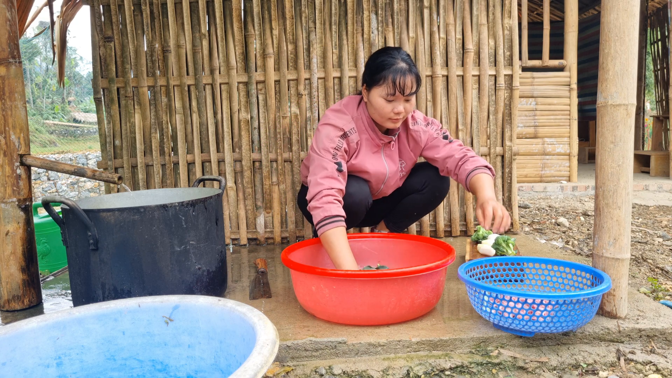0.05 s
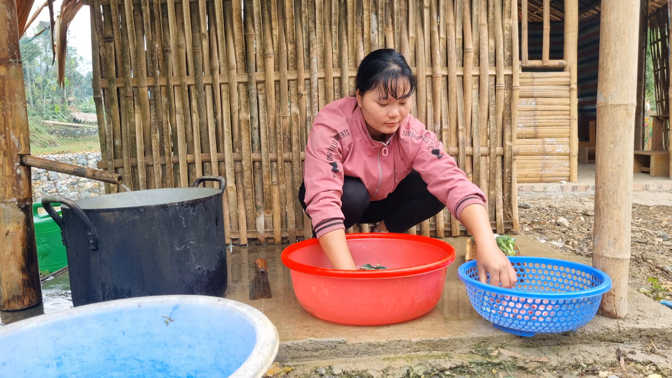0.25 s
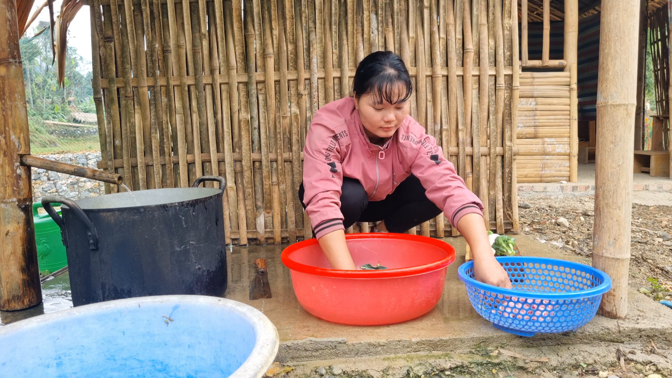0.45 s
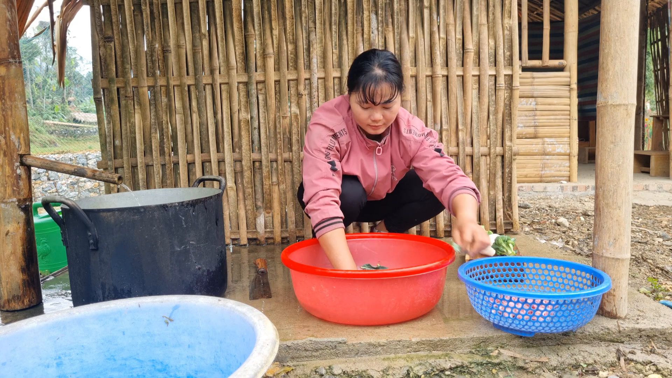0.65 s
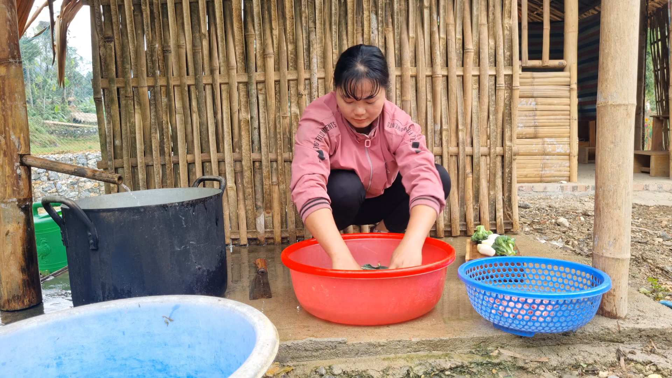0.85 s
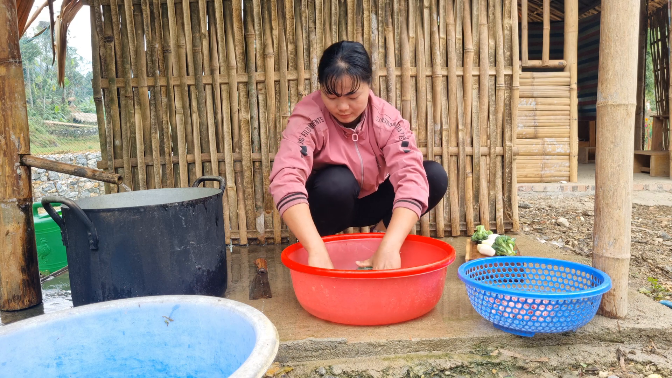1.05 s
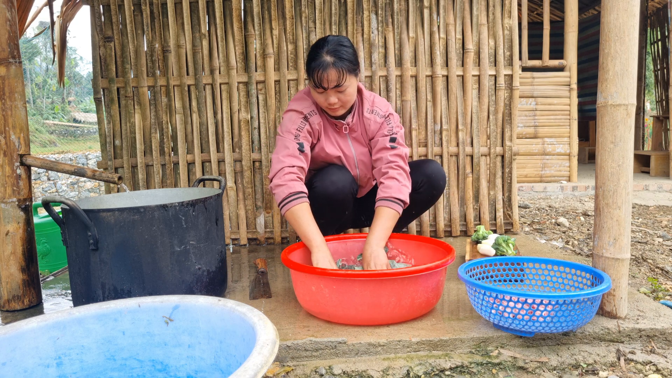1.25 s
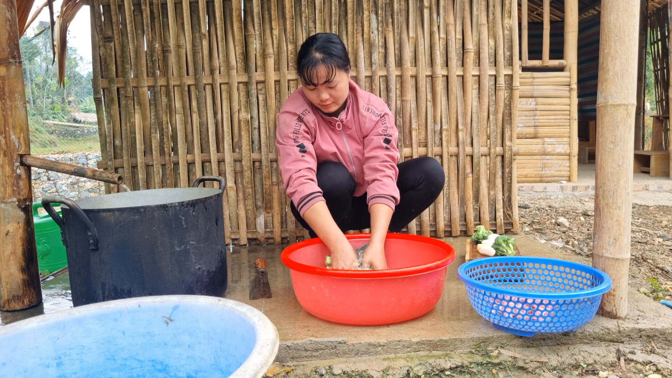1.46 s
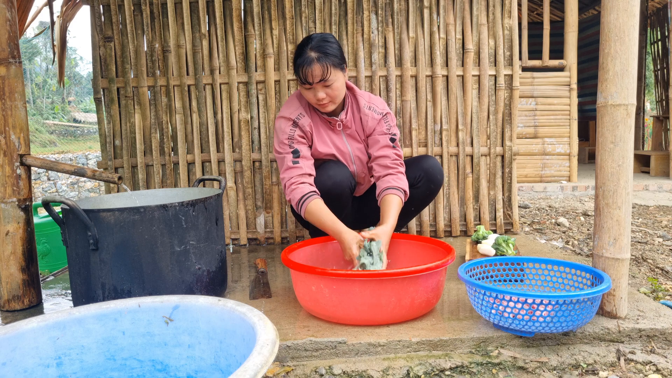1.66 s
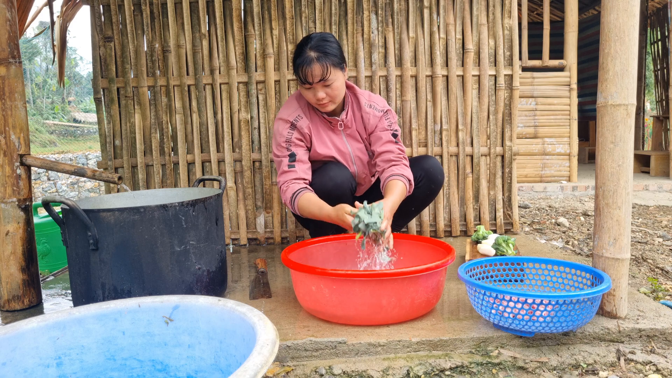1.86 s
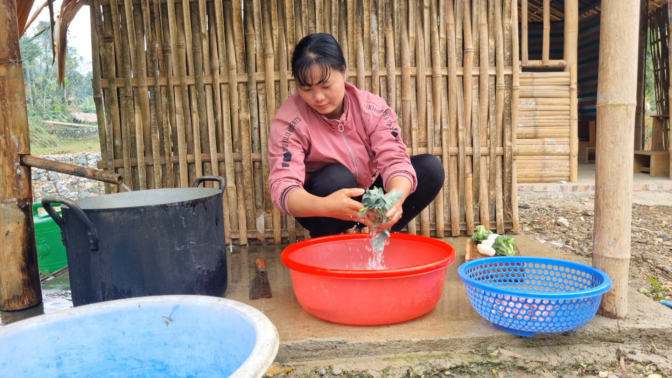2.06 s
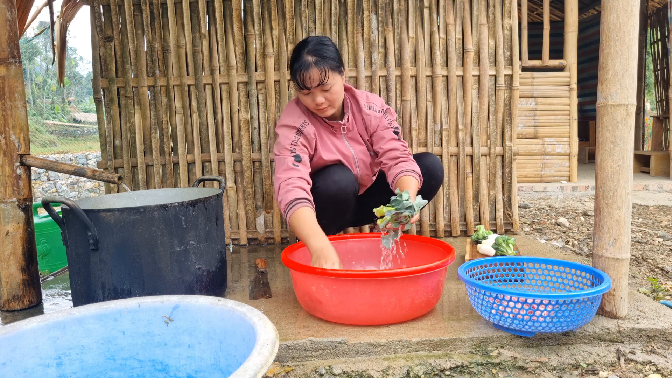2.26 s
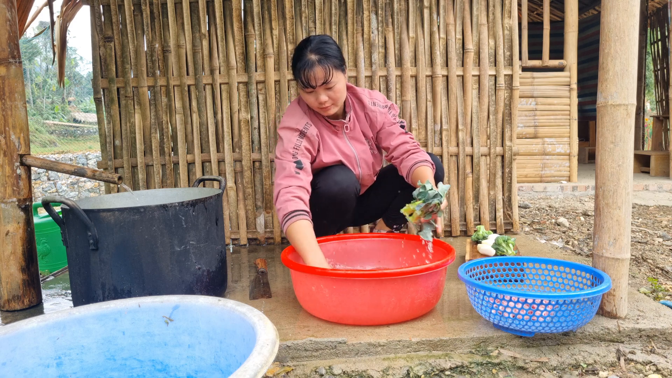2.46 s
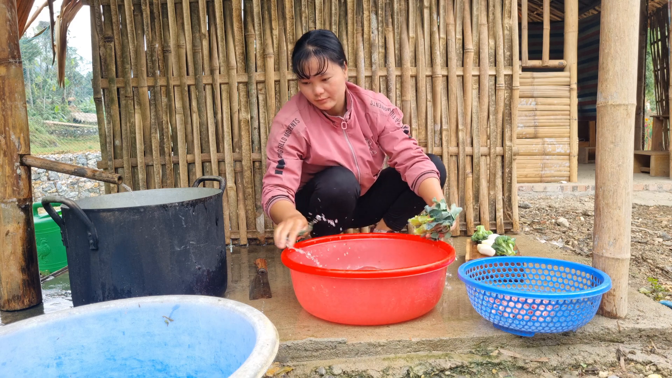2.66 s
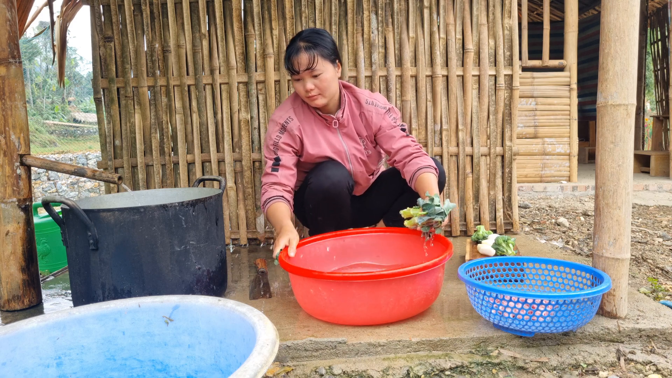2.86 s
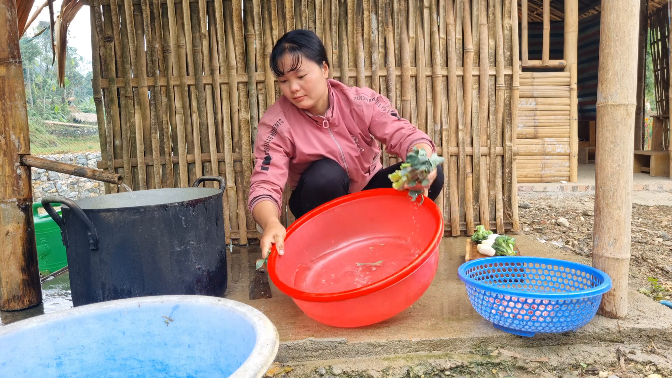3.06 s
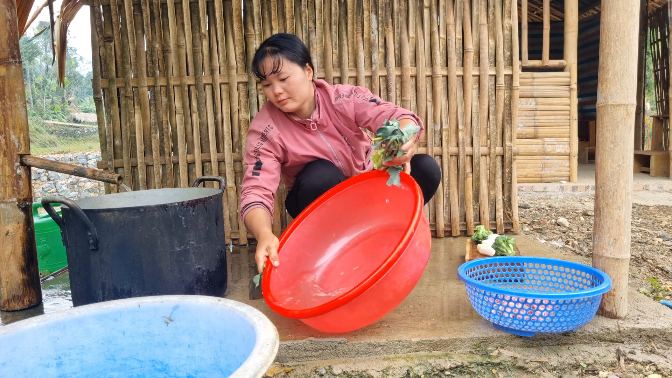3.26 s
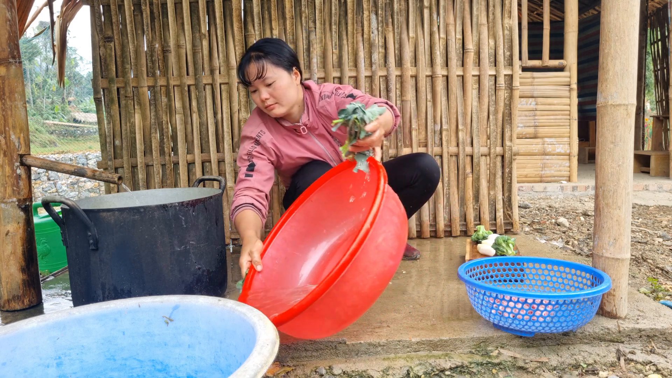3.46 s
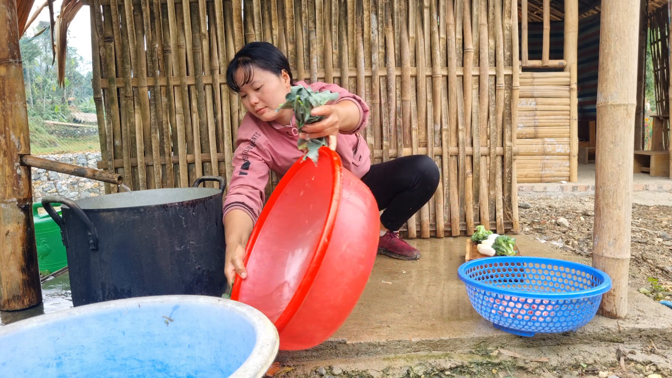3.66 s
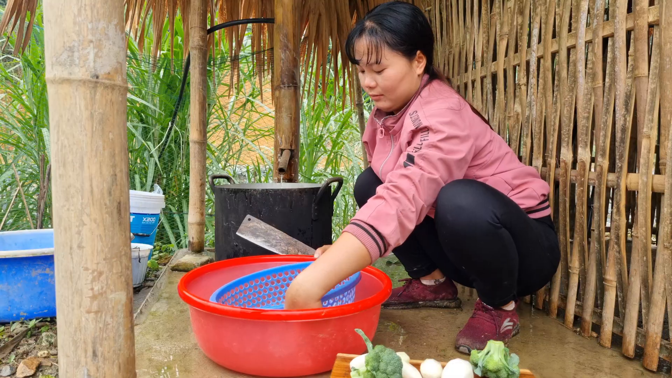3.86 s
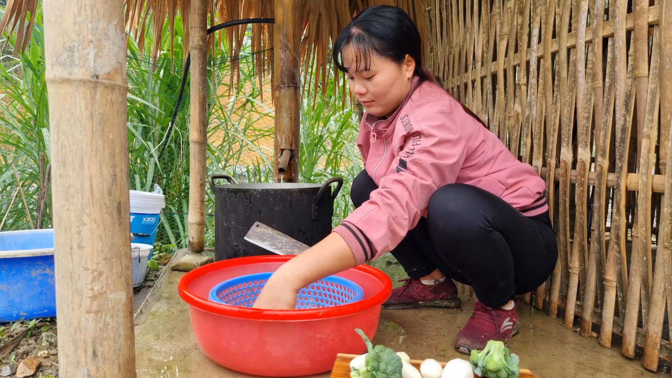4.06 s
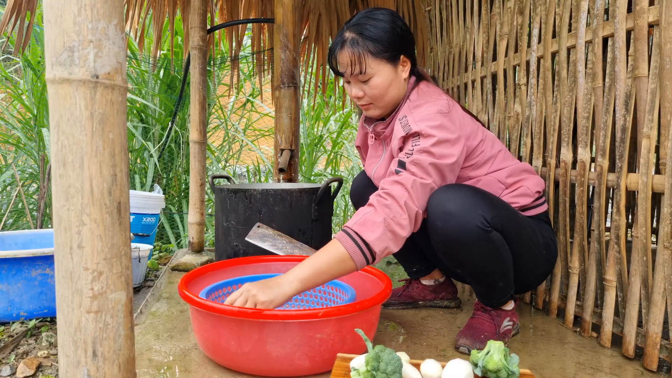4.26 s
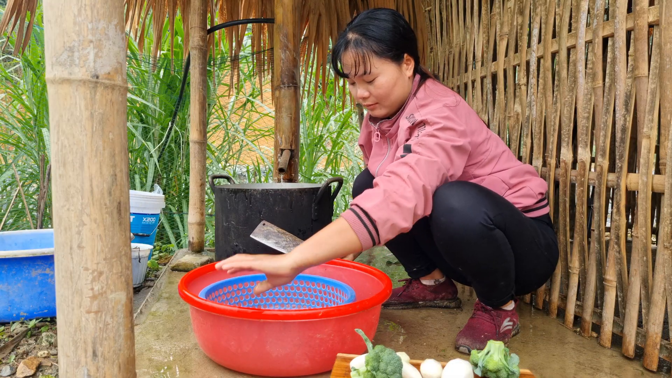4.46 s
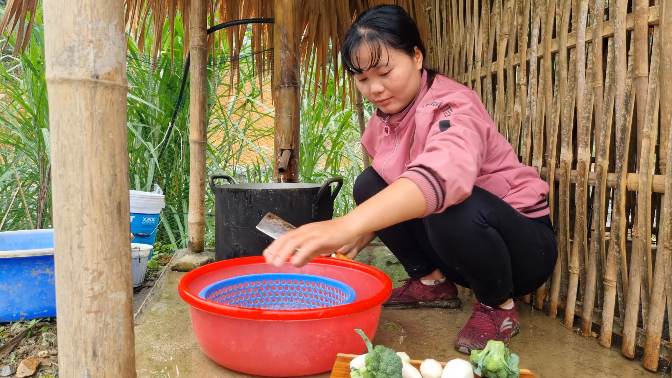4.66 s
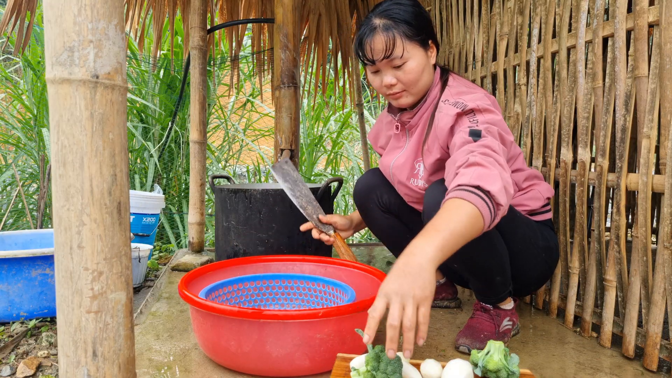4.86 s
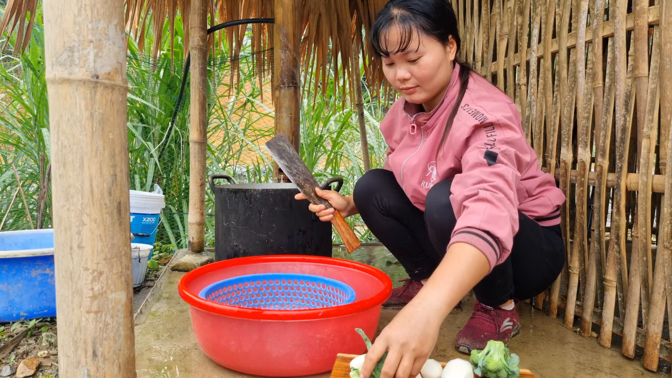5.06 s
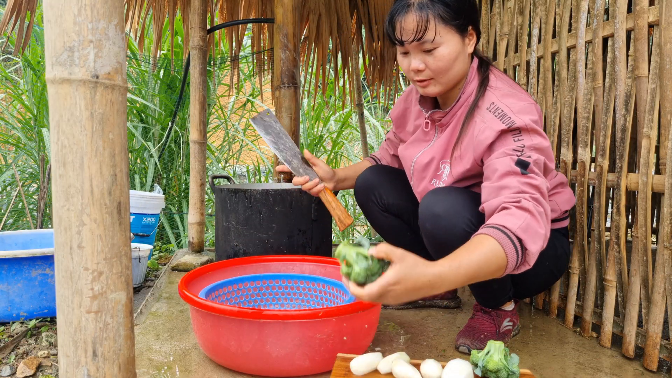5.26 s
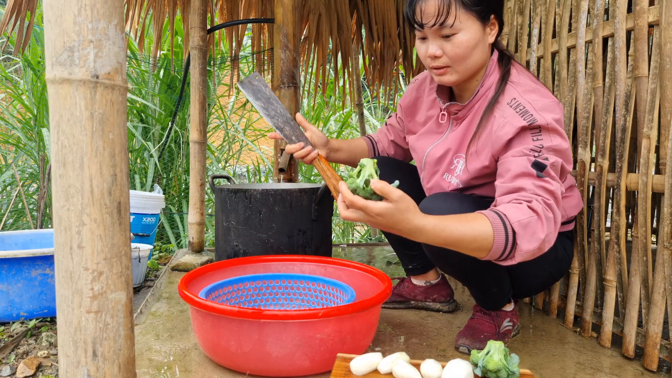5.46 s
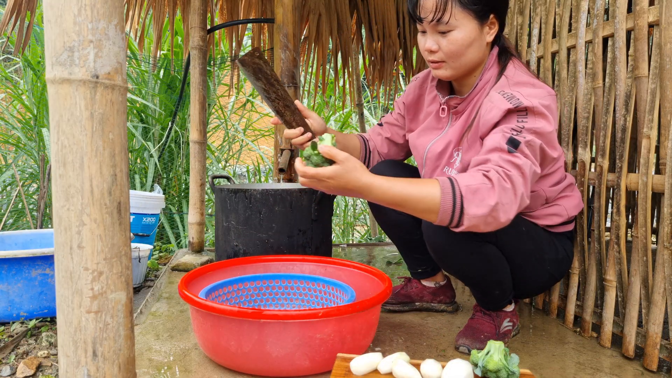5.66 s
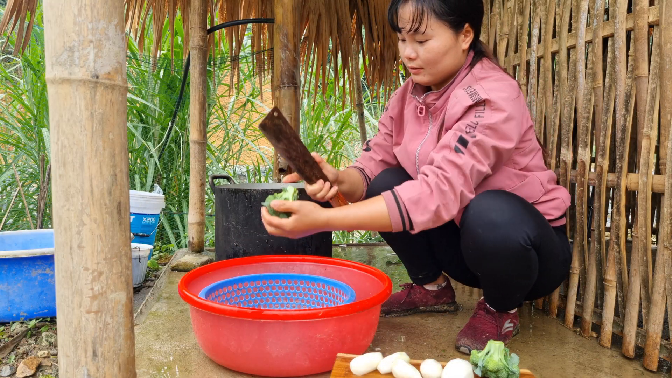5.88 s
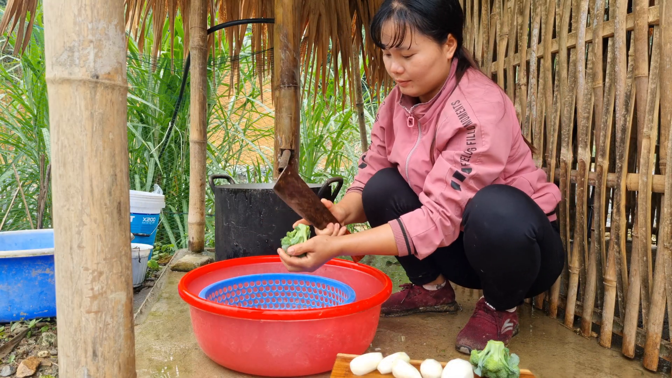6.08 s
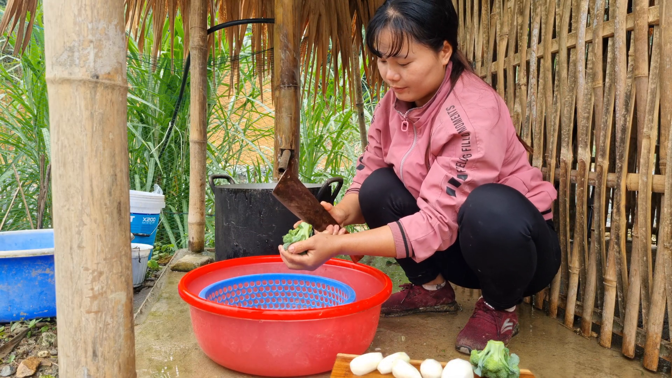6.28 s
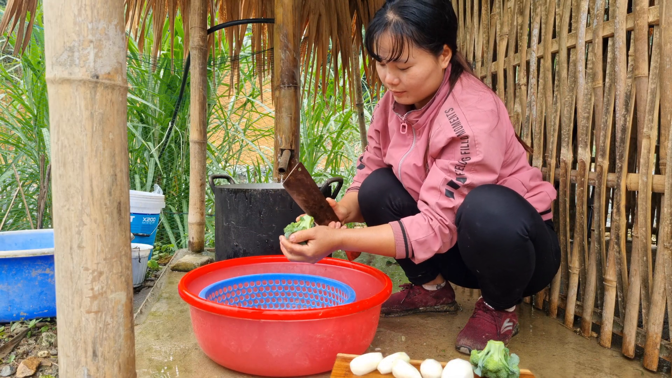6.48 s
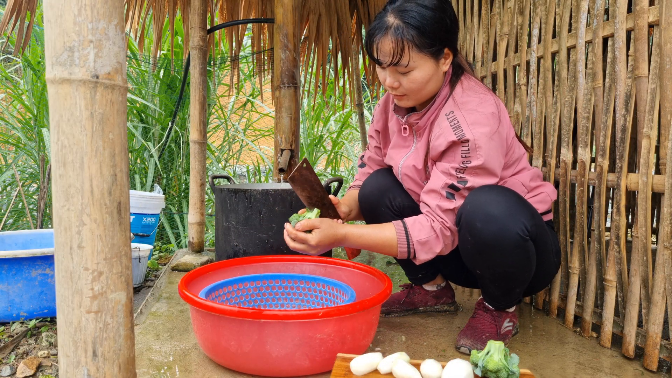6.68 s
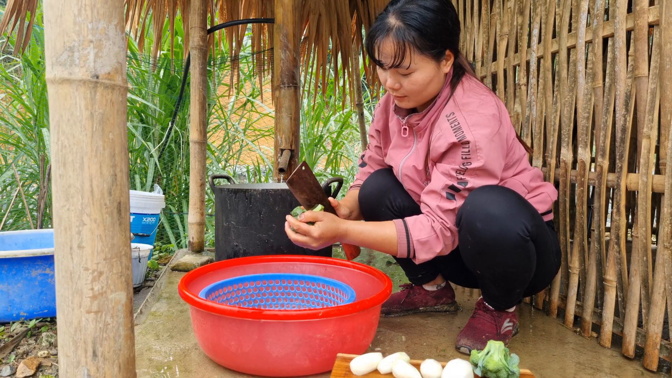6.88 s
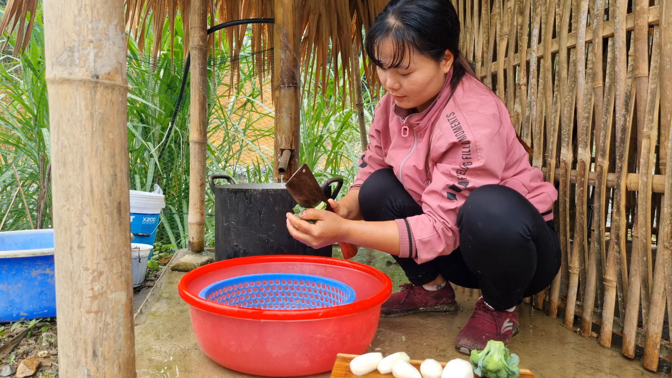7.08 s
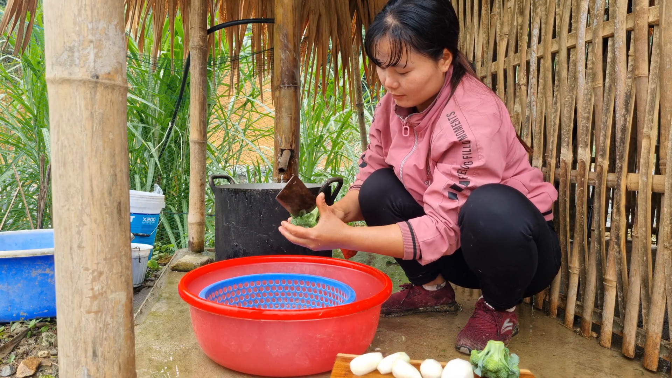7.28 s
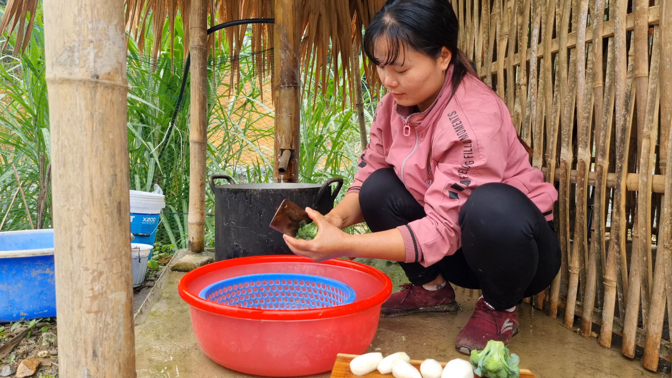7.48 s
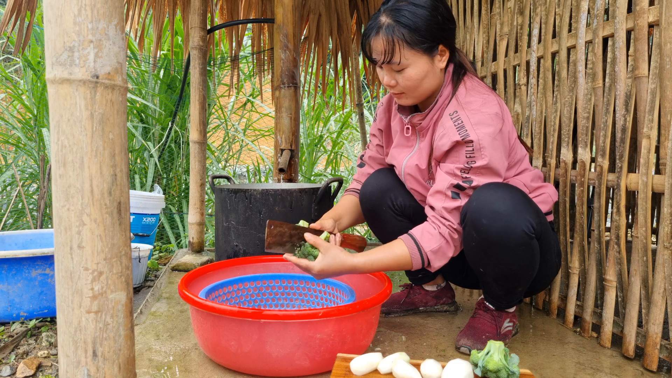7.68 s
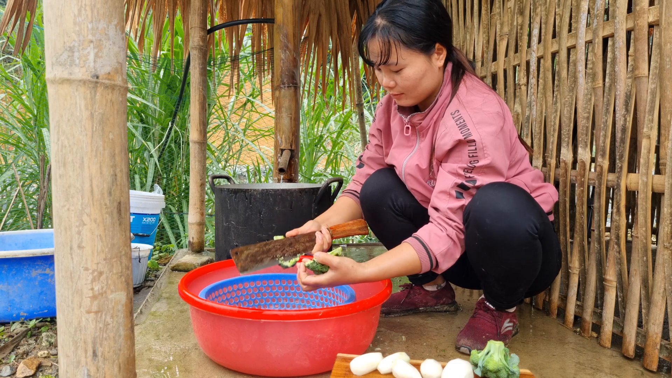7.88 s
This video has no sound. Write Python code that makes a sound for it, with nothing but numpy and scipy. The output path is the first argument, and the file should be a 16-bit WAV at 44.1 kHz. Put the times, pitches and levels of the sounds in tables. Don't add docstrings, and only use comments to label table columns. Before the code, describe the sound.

From 0 to about 1.1 s, sparse drips and soft swishes sound in a plastic basin over faint outdoor hiss and a barely audible distant idling engine. From 1.2 to 2.7 s the stirring gets busier: rising bubble plops, bright droplets, run-off spattering as greens are lifted; small high chick peeps appear from 2.25 s. Around 2.8 to 3.1 s the load sloshes and the basin knocks and rattles. At 3.45 s it tips, water gushes on concrete, strongest near 3.7 s, with a sharp rim slam at 3.66 s and loud hollow plastic bangs from 3.8 to 4.0 s. At 4 s the water ends and a low, steady engine hum enters. More knocks fall at 4.33 and 6.2 s. Until 8 s, sleeves rustle, a knife rasps and ticks in short gritty strokes, densest after 7 s, while a hen clucks softly and distant birds mutter.

```python
import sys
import numpy as np
from scipy import signal
from scipy.fft import rfft, irfft, next_fast_len
from scipy.io import wavfile
from scipy.ndimage import uniform_filter1d, map_coordinates

SR = 44100
rng = np.random.default_rng(int(sys.argv[2]) if len(sys.argv) > 2 else 0)


def transcribe(signal):
    frames = np.atleast_2d(signal).T
    limited = np.clip(frames, -1, 1)
    pcm = np.round(limited * 32767).astype(np.int16)
    wavfile.write(sys.argv[1], SR, pcm)


def boost(x):
    u = np.asarray(x, float) / 20
    return 10 ** u


N = 349713
T = np.arange(N) / SR


def unit(x):
    return x / np.sqrt(np.mean(x ** 2) + 1e-20)


def along(points, hz):
    f, v = np.transpose(points)
    return np.interp(np.log(hz + 1), np.log(f + 1), v)


def curves(rows):
    s, *cols = np.transpose(rows)
    gate = np.interp(T, [s[0] - .006, s[0], s[-1], s[-1] + .006], [0, 1, 1, 0])
    return [np.interp(T, s, c) for c in cols] + [gate]


def wobble(rate_hz):
    return map_coordinates(rng.standard_normal(int(N * rate_hz / SR) + 4), [T * rate_hz])


def swells(rows, skew=0.79, power=2.2):
    total = 0
    for s, length_s, db in rows:
        phase = np.clip((T - s) / length_s, 0, 1) ** skew
        total = total + boost(db) * np.abs(np.sin(np.pi * phase)) ** power
    return total


def colour(x, spectrum):
    m = next_fast_len(N + 8192)
    gain = boost(along(spectrum, np.fft.rfftfreq(m, 1 / SR)))
    return unit(irfft(rfft(x, m) * gain, m)[..., :N])


def rush(spectrum, patchy_db):
    # (f/Hz, correlation)
    alike = [(60, 0.89), (240, 0.96), (950, 0.28), (3770, 0.04), (15000, 0.0079)]
    hz, _, z = signal.stft(rng.standard_normal((2, N)), SR, nperseg=256)
    field = uniform_filter1d(rng.standard_normal(z.shape[1:]), size=4, axis=0)
    field = uniform_filter1d(field, size=7, axis=1)
    turn = np.arccos(np.clip(along(alike, hz), -1, 1))[:, None] / 2
    mid, side = z[0] * np.cos(turn), z[1] * np.sin(turn)
    pair = np.array([mid + side, mid - side]) * boost(patchy_db * unit(field))
    return colour(signal.istft(pair, SR, nperseg=256)[1][:, :N], spectrum)


def grains(count, hz, spread, cycles, scatter_db, rise):
    u, t = rng.random((count, 4)), np.arange(700) / SR
    f = np.clip(hz * np.exp(spread * (2 * u[:, 1:2] - 1)), 200, 14000)
    life = t * f / cycles
    tone = np.sin(2 * np.pi * f * t * (1 + rise * life)) * life * np.exp(-3 * life)
    tone *= boost(-scatter_db * np.log(u[:, 2:3] + .02))
    at = ((u[:, :1] * N).astype(int) + np.arange(len(t))).ravel()
    shares = u[:, 3:], 1 - u[:, 3:]
    return unit(np.array([np.bincount(at, (tone * np.sqrt(p)).ravel(), N + 800)[:N] for p in shares]))


def blip(hz, t60, swell, rise, noisy, width):
    t = np.arange(int(.25 * SR)) / SR
    edges = [hz / (1 + width), min(hz * (1 + width), 18000)]
    band = signal.butter(2, edges, "bandpass", fs=SR, output="sos")
    hiss = unit(signal.sosfilt(band, rng.standard_normal(len(t))))
    tone = np.sin(2 * np.pi * hz * t * (1 + rise * t / t60))
    shape = boost(-60 * t / t60) * (1 - np.exp(-t / (swell * t60))) ** 2
    hiss = hiss * np.linalg.norm(shape) / np.linalg.norm(hiss * shape)
    return ((1 - noisy) * tone + noisy * hiss / 2) * shape / shape.max()


def add(out, s, sound, pan_db):
    at = round(s * SR)
    out[:, at:at + len(sound)] += (boost([[pan_db / 2], [-pan_db / 2]]) * sound)[:, :N - at]


def left_first(x):
    return np.array([x[0], np.roll(x[1], 2)])


def bands(x):
    # (f/Hz, width/Hz, level/dB)
    throat = [(687, 45, 1), (1170, 70, 2), (1744, 70, -6), (1920, 32, 1)]
    for hz, width, db in throat:
        band = signal.butter(1, [hz - width / 2, hz + width / 2], "bandpass", fs=SR, output="sos")
        yield db, signal.sosfilt(band, x)


def yard():
    # (f/Hz, level/dB per Hz)
    spectrum = [(88, -4), (150, -4), (645, 29), (1500, -35), (7770, 2), (9080, -24), (14800, 14),
                (16000, 19)]
    return boost(-67.5) * rush(spectrum, patchy_db=-3.5)


def orders(rows, levels, unsteady_db, drift_rad=0.32):
    hz, db, gate = curves(rows)
    turn = 2 * np.pi * np.cumsum(hz) / SR
    hum = 0
    for k, level_db in levels:
        gain = boost(level_db + unsteady_db * wobble(2.994))
        hum = hum - gain * np.cos(k * turn + drift_rad * wobble(4.6))
    return gate * boost(db) * unit(hum) * boost([[1.2], [-1.2]])


def engine():
    # (t/s, firing/Hz, level/dB)
    working = [
        (4.02, 31.75, -49),
        (4.3, 32.69, -47),
        (4.8, 31.7, -47.5),
        (5.03, 33.75, -46),
        (5.2, 32.07, -48),
        (6.5, 32.98, -48),
        (7.93, 33, -49),
    ]
    # (multiple, level/dB)
    working_orders = [(1, -28), (2, 2), (3, -9), (4, -1.5), (5, -5.5), (6, -23), (7, -27), (8, -34)]
    # (t/s, firing/Hz, level/dB)
    idling = [
        (0, 18.7, -65),
        (1.1, 18, -73),
        (1.6, 18.6, -58),
        (2.0, 17.2, -66.5),
        (2.5, 18, -63),
        (3.4, 18, -81),
    ]
    # (multiple, level/dB)
    idling_orders = [(4, 4), (5, 5), (6, 5), (7, -31)]
    # (f/Hz, level/dB per Hz)
    rumble_spectrum = [(13, -30), (22, 0), (59, 6), (140, 1), (160, 5.5), (220, -34), (290, -43),
                       (480, -120)]
    _, db, gate = curves(working)
    rumble = gate * boost(db - 7.5) * rush(rumble_spectrum, patchy_db=-2.0)
    hum = orders(working, working_orders, unsteady_db=1.55)
    return hum + orders(idling, idling_orders, unsteady_db=2.5, drift_rad=1.8) + rumble


def clucks():
    # (t/s, peak/dB, f/Hz)
    events = [(4.109, -36.5, 1890), (4.155, -40.5, 1155), (4.2, -43, 692), (4.245, -47, 1110),
              (4.434, -47, 590), (4.541, -42, 570), (4.644, -46, 510), (4.649, -48, 1110),
              (4.65, -44.5, 1570), (4.838, -46, 1260), (4.838, -47, 680), (4.87, -44.5, 740),
              (4.871, -48, 1235), (5.139, -52, 1500), (5.429, -42.5, 1970), (5.5, -49, 1960),
              (5.538, -51, 740), (5.653, -51, 1950), (5.745, -38.5, 1653), (5.793, -40, 680),
              (5.89, -48, 1780), (6.12, -39, 1930), (6.194, -38.5, 1930), (6.237, -38.5, 1118),
              (6.289, -36, 1165), (6.335, -39.5, 1900), (6.381, -39.5, 1906), (6.46, -47, 684),
              (6.622, -44.5, 1904), (6.648, -46, 620), (6.77, -42, 1200), (6.93, -47, 1610),
              (6.955, -41.5, 1920), (7.07, -49, 1907), (7.095, -36.5, 495), (7.115, -51, 1170),
              (7.166, -47.5, 1140), (7.184, -41, 1896), (7.253, -49, 1110), (7.265, -52, 1930),
              (7.29, -48, 526), (7.31, -46, 1170), (7.33, -48, 1916), (7.4, -44, 1184), (7.42, -45, 1735),
              (7.43, -43, 1920), (7.517, -44, 1650), (7.536, -39.5, 1920), (7.579, -47, 1918),
              (7.66, -48, 1165), (7.672, -38, 702), (7.805, -53, 1920), (7.865, -64, 1920)]
    out = np.zeros((2, N))
    for s, db, hz in events:
        add(out, s, boost(db - 2) * blip(hz, .068, swell=.08, rise=.005, noisy=.55, width=.04), .8)
    return out


def flock():
    out = np.zeros(N)
    for db, ring in bands(rng.standard_normal(N)):
        mutter = unit(ring) * boost(4 * wobble(20))
        out += boost(db - 78.5) * mutter * np.interp(T, [5.3, 6.3], [.45, 1.4])
    return out


def peeps():
    # (t/s, length/s, first f/Hz, last f/Hz, level/dB)
    events = [(2.25, .09, 6700, 7200, -43), (2.455, .105, 6600, 6650, -39), (2.615, .09, 5250, 6950, -44),
              (2.805, .075, 6850, 6600, -40), (3.05, .09, 5000, 4050, -52), (3.205, .06, 4850, 4700, -50),
              (6.67, .16, 1740, 1750, -51), (2.885, .05, 6500, 6000, -45), (3.31, .07, 5000, 4700, -55),
              (7.52, .41, 1470, 1460, -64), (7.72, .13, 680, 680, -65), (6.25, .04, 4300, 4000, -53),
              (6.94, .12, 1700, 1760, -52), (7.24, .04, 4350, 4150, -52), (4.84, .07, 1240, 1210, -56),
              (4.91, .06, 700, 690, -59), (4.98, .05, 960, 950, -63), (4.985, .05, 500, 490, -59)]
    out = np.zeros(N)
    for s, length_s, first_hz, last_hz, db in events:
        hz = np.interp(T, [s, s + length_s], [first_hz, last_hz])
        arch = 0.042 * (first_hz > 3000)
        hz = hz * (1 + arch * swells([(s, length_s, 0)], skew=0.82, power=0.7))
        tremble = boost(3 * wobble(50) + 4 * wobble(220) - 3)
        tone = np.sin(2 * np.pi * np.cumsum(hz * (1 + .015 * wobble(250))) / SR)
        out += tremble * swells([(s, length_s, db)], skew=.7, power=.7) * tone
    return out


def hands():
    # (t/s, effort/dB)
    effort = [
        (3.98, -52.5),
        (4.39, -59),
        (4.9, -60),
        (5.33, -61),
        (5.43, -56),
        (5.9, -58.5),
        (6.03, -59),
        (6.5, -61.5),
        (7.93, -61.5),
    ]
    # (t/s, length/s, level/dB)
    stroke_rows = [(4.542, 0.12, -60.5), (4.614, 0.12, -57), (5.088, 0.094, -61.5), (5.442, 0.061, -55),
                   (5.785, 0.12, -49.5), (5.97, 0.062, -59.5), (6.15, 0.097, -54.5), (6.745, 0.082, -52.5),
                   (6.955, 0.099, -53), (7.179, 0.052, -48), (7.408, 0.073, -46), (7.517, 0.033, -49),
                   (7.865, 0.015, -55.5), (4.81, 0.087, -62.5), (7.72, 0.034, -59)]
    # (t/s, peak/dB, f/Hz)
    ticks = [(4.2094, -34, 4260), (4.325, -25.5, 2980), (4.5599, -47, 7600), (4.5829, -43, 4000),
             (4.6186, -44, 7710), (4.7105, -36, 5600), (4.79, -34.5, 7200), (4.8223, -55, 7640),
             (4.8763, -39, 3820), (5.3246, -37.5, 4950), (5.446, -34.5, 3060), (5.4808, -54, 7990),
             (5.597, -34, 7860), (5.61, -44, 4470), (5.757, -41, 2960), (5.789, -42, 7900),
             (5.9767, -49, 7460), (6.1633, -31, 5400), (6.1712, -24.5, 7460), (6.2367, -38, 5070),
             (6.384, -41.5, 2300), (6.473, -40, 9650), (6.754, -47, 5390), (6.9238, -40, 4520),
             (6.9655, -30, 6700), (7.0067, -37.5, 3280), (7.1779, -41, 4400), (7.1999, -40, 3500),
             (7.415, -48, 3020), (7.438, -33, 7760), (7.5184, -24, 6900), (7.5182, -30.5, 3430),
             (7.579, -37, 5940), (7.6306, -35, 8000), (7.6933, -33, 7000), (7.8664, -32, 7420)]
    # (f/Hz, level/dB per Hz)
    rasp_spectrum = [(880, -13), (1500, -9.5), (3000, -4), (5490, -3.5), (7920, -2), (9280, -11.5),
                     (14800, -9.5), (16000, -59)]
    rustle_spectrum = [(110, -13), (190, 1), (684, -3), (1220, -5.5), (1470, -7), (3000, -11), (3900, -40),
                       (6600, -120)]
    resting_db = -61
    effort_db, gate = curves(effort)
    rasp_db = resting_db + 0.71 * (effort_db - resting_db)
    rustle_db = resting_db + 1.36 * (effort_db - resting_db)
    strokes = swells(stroke_rows, skew=.6, power=.45)
    grit = 1.2 * rush(rasp_spectrum, patchy_db=2.4)
    grit += .13 * grains(count=3000, hz=6000, spread=.7, cycles=1.5, scatter_db=5.5, rise=0)
    out = (strokes + gate * boost(rasp_db + 1.0)) * boost(1.7 * wobble(45)) * grit
    out += gate * boost(rustle_db - 3.0 + 0.33 * wobble(4.8)) * rush(rustle_spectrum, patchy_db=5.0)
    for s, db, hz in ticks:
        add(out, s, boost(db - 1.5) * blip(hz, .032, swell=.008, rise=0, noisy=.85, width=.35), -1.2)
    return out


def knocks():
    # (t/s, peak/dB, wall f/Hz, boom/dB, rattle/dB)
    blows = [(2.841, -22, 600, -5.5, 8.5), (2.88, -33.5, 595, -6, 1), (2.999, -34.5, 430, -11, -15),
             (2.932, -28, 570, -9, 4), (2.942, -27.5, 1110, -4, 11), (2.971, -31.5, 355, -8, -13),
             (3.052, -37, 197.3, 9, -20), (3.32, -28, 268, -19, 4), (3.666, -22.5, 960, 2, -7),
             (3.743, -20, 390, -19, 7), (3.821, -18, 985, -20, 2), (3.828, -15.5, 880, -18, 7),
             (3.835, -9.5, 271, -4, -19), (3.836, -11.5, 1030, -3, 2), (3.86, -22, 633, -1, -20),
             (3.898, -17.5, 406, 0, -3), (3.994, -22, 1500, -1, 15), (3.998, -11, 398, -7, 15),
             (4.009, -17, 1145, -1.5, -20), (4.062, -19, 370, -7, 7.5), (4.328, -22, 1250, -17, 3),
             (4.334, -21, 1500, -19, 1), (4.342, -19.5, 1200, -4.5, 8.5), (6.183, -15, 418, 0, -10),
             (6.201, -24, 244, -21, -25), (6.233, -27, 385, -1, 2.5), (7.443, -28.5, 210, 2, -17),
             (7.485, -32, 254, 4, -18)]
    out = np.zeros((2, N))
    for s, db, hz, boom_db, rattle_db in blows:
        t60 = 0.028 * (500 / hz) ** 0.29
        wall = blip(hz, t60, swell=.045, rise=0, noisy=.4, width=.45)
        wall += .6 * blip(.72 * hz, .6 * t60, swell=.035, rise=0, noisy=.4, width=.4)
        boom = boost(boom_db - 2.5) * blip(215, 1.87 * t60, swell=0.009, rise=-0.063, noisy=0.92, width=1.0)
        boom += boost(boom_db - 1.0) * blip(121.0, 1.66 * t60, swell=0.032, rise=0, noisy=1.0, width=0.44)
        rattle = boost(rattle_db - 6.0) * blip(1270, 1.55 * t60, swell=0.019, rise=0, noisy=0.84, width=0.99)
        blow = wall + boom + rattle
        add(out, s, boost(db - 3.5) * blow / np.abs(blow).max(), .3)
    return out


def rim():
    # (t/s, length/s, f/Hz, peak/dB)
    slams = [
        (3.6592, .0058, 640, -12),
        (3.6596, .0035, 2300, -22),
        (3.6598, .0064, 930, -10),
        (6.1832, .011, 660, -21),
    ]
    # (t/s, peak/dB, f/Hz, t60/s)
    snap = (3.6462, -10, 7600, .005)
    out = np.zeros((2, N))
    for s, length_s, hz, db in slams:
        arch = swells([(s, length_s, db)], skew=1, power=.6)
        out += boost([[1.5], [-1.5]]) * arch * np.sin(2 * np.pi * hz * (T - s))
    s, db, hz, t60 = snap
    crack = blip(hz, t60, swell=.2, rise=0, noisy=.6, width=.25)
    crack += .7 * blip(hz / 2, t60, swell=.2, rise=0, noisy=1, width=.7)
    add(out, s, boost(db) * crack, -1.5)
    return out


def splats():
    # (t/s, peak/dB, f/Hz)
    events = [(0.0686, -28.5, 2810), (0.074, -30.5, 9150), (0.189, -37, 7760), (0.473, -39, 6300),
              (1.201, -37.5, 4140), (1.44, -37, 4460), (1.545, -34.5, 5370), (1.579, -30, 6100),
              (1.753, -36.5, 3400), (1.872, -29, 5700), (1.985, -30.5, 3360), (2.0283, -31, 3180),
              (2.079, -38, 3540), (2.0965, -23, 4900), (2.135, -27.5, 7450), (2.1926, -27.5, 4550),
              (2.3142, -32, 2930), (2.348, -28.5, 3440), (2.356, -32.5, 3560), (2.7835, -29.5, 5200),
              (2.842, -34, 3340), (2.932, -30.5, 6750), (3.026, -33, 4490), (3.157, -38, 4590),
              (3.309, -39.5, 4700), (3.441, -29.5, 7600), (3.4525, -20.5, 3880)]
    t60 = .042
    out = np.zeros((2, N))
    for s, db, hz in events:
        mist = .42 * blip(11000, t60, swell=.008, rise=0, noisy=1, width=.5)
        burst = blip(hz, t60, swell=.008, rise=0, noisy=.75, width=.24)
        add(out, s, boost(db - 1) * (burst + mist), -1.2)
    return out


def beads():
    # (t/s, peak/dB, f/Hz)
    events = [(.054, -52, 2900), (0.419, -42, 3930), (0.559, -36.5, 3100), (0.6014, -35, 5560),
              (.696, -44, 4440), (.963, -38, 3350), (1.275, -38, 3500), (1.3084, -34, 2590),
              (1.48, -37, 3400), (1.617, -32, 3620), (1.8167, -30, 3000), (1.921, -28, 3030),
              (2.2283, -27, 3610), (2.4289, -30, 3260), (2.466, -33, 3950), (2.645, -35, 4330),
              (2.695, -32, 3230), (2.7675, -36, 7940), (2.8105, -28, 5400), (3.3598, -34, 5020),
              (3.384, -29.5, 2940), (3.4987, -19, 1550), (3.506, -16, 2470), (3.58, -23, 1840),
              (3.6, -24.5, 3200), (3.716, -15.5, 1910), (3.7401, -20, 2100), (3.774, -26, 1770),
              (3.94, -19, 2910)]
    out = np.zeros((2, N))
    for s, db, hz in events:
        ring = blip(hz, 0.033, swell=0.021, rise=0.03, noisy=0.76, width=0.103)
        add(out, s, boost(db - 6.5) * ring, -.8)
    return out


def plops():
    # (t/s, peak/dB, f/Hz)
    drips = [(0.048, -47.5, 641), (.215, -45.5, 895), (0.273, -46.5, 1070), (.678, -50, 650),
             (.8, -48, 1800), (.875, -51, 605), (0.344, -47, 538), (0.374, -47.5, 1040), (0.445, -43, 1054),
             (0.557, -44.5, 1094), (0.695, -37.5, 1057), (0.756, -42.5, 1150), (0.831, -43.5, 953),
             (0.872, -45.5, 1836), (0.953, -36, 948), (0.984, -36.5, 1060), (1.032, -36, 627),
             (1.056, -34.5, 1480), (1.19, -47, 1130)]
    # (t/s, peak/dB, f/Hz)
    stirred = [(1.289, -41, 1400), (1.365, -36.5, 1730), (1.477, -37, 1834), (1.544, -35.5, 428),
               (1.601, -24, 1724), (1.617, -27.5, 1910), (1.738, -32.5, 1605), (1.909, -36.5, 1470),
               (1.963, -43, 760), (2.097, -29, 1392), (2.137, -31.5, 1435), (2.222, -36, 1820),
               (2.279, -34.5, 632), (2.319, -32, 426), (2.407, -34.5, 1830), (2.468, -32, 2210),
               (2.543, -35.5, 1145), (2.555, -29, 1740), (2.675, -39.5, 2020), (2.72, -38.5, 616),
               (1.167, -54, 1680), (1.306, -32, 1436), (1.415, -45, 670), (1.439, -39, 1606),
               (1.49, -41, 480), (1.545, -33, 1022), (1.601, -36, 467), (1.61, -30, 801), (1.72, -42, 493),
               (1.742, -40, 550), (1.802, -44, 1590), (1.98, -45, 750), (2.044, -33, 1820),
               (2.05, -43, 620), (2.097, -32, 1940), (2.125, -43, 654), (2.18, -38.5, 1380),
               (2.346, -27.5, 1840), (2.393, -53, 1170), (2.485, -41.5, 704), (2.528, -41.5, 2100),
               (2.696, -43, 1270), (2.748, -44, 1117), (3.452, -30, 1130), (3.475, -28.5, 617)]
    out = np.zeros((2, N))
    for rows, pan_db in (drips, 5.5), (stirred, 0):
        for s, db, hz in rows:
            bubble = blip(hz, 0.058 * (1000 / hz) ** 0.4, swell=0.06, rise=.08, noisy=.42, width=.26)
            slap = 0.47 * blip(1407, 0.077, swell=0.022, rise=0, noisy=0.8, width=4.0)
            low_left_db = -0.5 * np.log2(hz / 1500)
            add(out, s, boost(db - 3.0) * (bubble + slap), pan_db + low_left_db)
    return out


def flow():
    # (t/s, flow/dB)
    runoff = [(0, -50.5), (.2, -56.5), (.55, -52.5), (.75, -55.5), (1.2, -48.5), (1.45, -51.5), (1.9, -46),
              (2.2, -43.5), (2.38, -47.5), (2.6, -50), (2.85, -46.5), (3.02, -48), (3.2, -55), (3.3, -53.5),
              (3.43, -42.5)]
    # (t/s, flow/dB)
    pour_rows = [
        (3.44, -39.5),
        (3.52, -35.5),
        (3.57, -39),
        (3.7, -32),
        (3.8, -35),
        (3.96, -40),
        (3.99, -47.5),
        (4.1, -63),
    ]
    # (t/s, length/s, level/dB)
    swishes = [(0, 0.17, -53.5), (.66, 0.12, -64), (.92, 0.29, -54.5), (1.15, 0.13, -46.5),
               (1.26, 0.22, -45), (1.44, 0.29, -47.5), (1.67, 0.18, -50.5), (1.96, 0.11, -47.5),
               (2.25, 0.13, -41), (2.4, 0.072, -44.5), (2.66, 0.18, -69), (2.93, 0.2, -52),
               (3.32, 0.063, -48), (3.47, 0.042, -36), (3.67, 0.11, -32)]
    # (t/s, length/s, level/dB)
    surges = [
        (1.15, 0.47, -63),
        (1.44, 0.24, -62),
        (2.3, 0.26, -57.5),
        (2.64, 0.25, -64),
        (2.82, 0.4, -45.5),
        (3.31, 0.14, -46),
        (3.82, 0.28, -49),
    ]
    # (f/Hz, level/dB per Hz)
    gurgle_spectrum = [(88, -22), (330, -4.5), (600, -10), (1880, 1), (2190, -10), (4000, -7.5),
                       (5200, -14), (8800, -120)]
    spray_spectrum = [(1470, -12), (2500, -15), (2920, 0), (5150, 2), (7650, 3.5), (9660, -6.5),
                      (13900, -3.5), (16000, -6.5)]
    slosh_spectrum = [(22, -42), (48, -2.5), (97, -2), (119, -11.5), (167, -8), (260, -19.5), (340, -16),
                      (570, -120)]
    flow_db, running = curves(runoff)
    pour_db, pouring = curves(pour_rows)
    pour = pouring * boost(pour_db)
    stirred = running * boost(-31 - 6 + 1.1 * (flow_db + 31)) + swells(swishes)
    shifting = running * boost(flow_db - 24) + boost(-16.5) * pour + swells(surges, skew=0.67)
    surge = wobble(22.29)
    churn = rush(gurgle_spectrum, patchy_db=4.5)
    bubbles = grains(count=3000, hz=1250, spread=.85, cycles=20, scatter_db=2.6, rise=.08)
    droplets = grains(count=3000, hz=4200, spread=.7, cycles=22, scatter_db=3.3, rise=.01)
    spray = .85 * rush(spray_spectrum, patchy_db=3) + .38 * droplets
    out = stirred * boost(3.2 * surge - 3.8) * (.62 * churn + .7 * bubbles)
    out += (running * boost(flow_db) + pour) * boost(2.8 * surge - 3) * spray
    out += boost(-4 + 1.6 * surge) * pour * (churn + 0.38 * bubbles)
    return out + shifting * rush(slosh_spectrum, patchy_db=0.5)


def porch(x):
    # (f/Hz, t60/s)
    decay = [(200, 0.037), (1500, 0.13), (9000, 0.057)]
    hz, t, z = signal.stft(rng.standard_normal((2, SR // 3)), SR, nperseg=256)
    tail = signal.istft(z * boost(-60 * t / along(decay, hz)[:, None]), SR, nperseg=256)[1]
    delayed = np.pad(x, ((0, 0), (200, 0)))
    return signal.fftconvolve(delayed, tail / np.linalg.norm(tail[0]), axes=1)[:, :N]


def pot(x):
    return boost(-6.5) * sum(boost(db) * ring for db, ring in bands(np.tanh(x / .03) * .03))


def scene():
    water = flow() + plops() + beads() + splats()
    handling = water + left_first(knocks() + rim() + hands())
    poultry = clucks() + flock() + peeps()
    near = handling + pot(handling) + left_first(poultry)
    return near + boost(-10.0) * porch(near) + left_first(engine()) + yard()


def roll_off(x):
    return signal.sosfilt(signal.butter(12, 16630, fs=SR, output="sos"), x)


def record(dry):
    lead_s, top_hz = 1.5e-5, 15800
    hz = np.fft.rfftfreq(N, 1 / SR)
    tilt = boost(along([(3000, 0.5), (9000, -1.32)], hz))
    skew = tilt * np.exp(1j * np.pi * hz * lead_s)
    ports = irfft(rfft(dry) * [skew, 1 / skew] * (hz < top_hz), N)
    return roll_off(ports)


dry = scene()
out = record(dry)
transcribe(out)
```